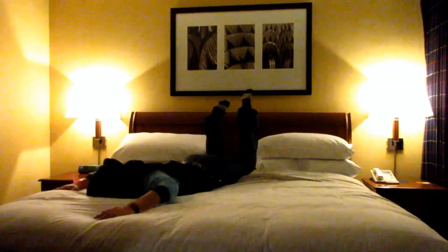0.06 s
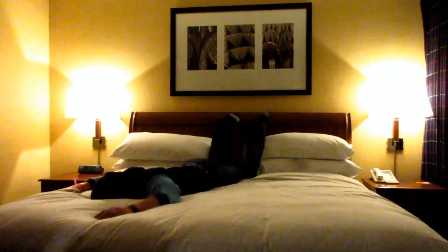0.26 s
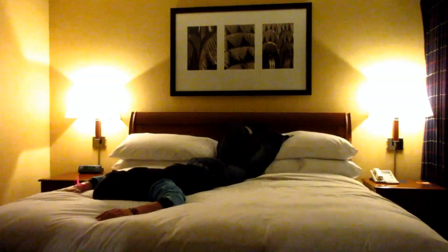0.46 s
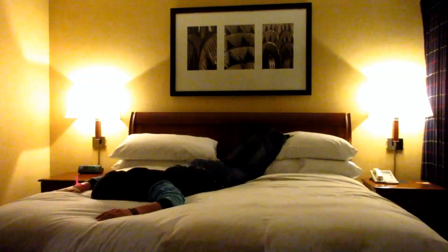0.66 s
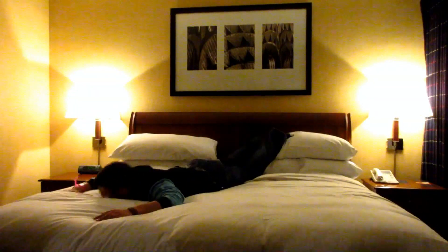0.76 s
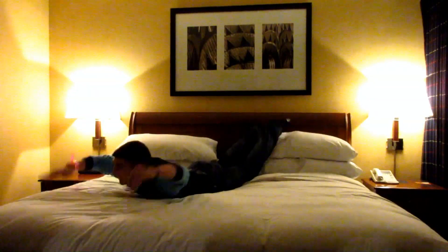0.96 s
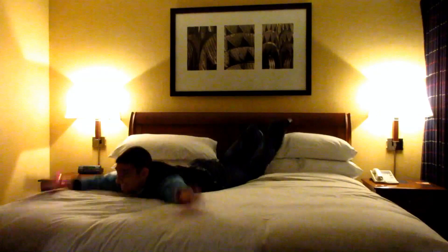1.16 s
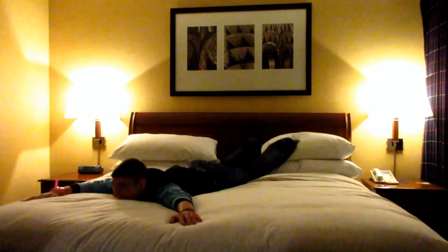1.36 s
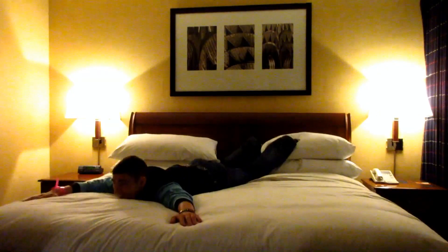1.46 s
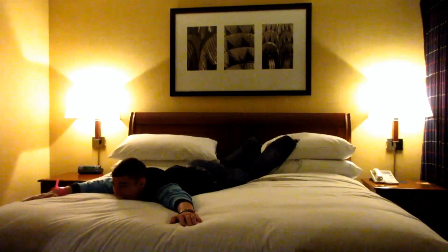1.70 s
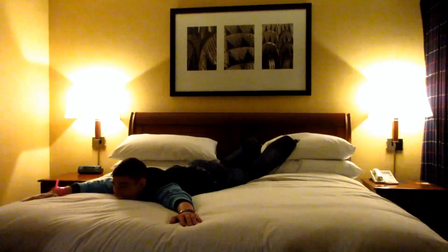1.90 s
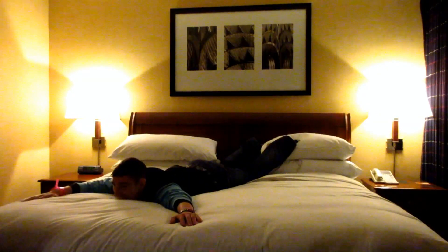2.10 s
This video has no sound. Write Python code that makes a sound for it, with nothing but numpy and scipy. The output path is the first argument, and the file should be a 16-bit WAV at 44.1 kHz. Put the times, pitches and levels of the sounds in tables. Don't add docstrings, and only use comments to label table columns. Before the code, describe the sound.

A body flops onto a mattress with a low thump, then a knock on the wooden headboard

```python
import sys
import numpy as np
from scipy import signal
from scipy.fft import rfft, irfft
from scipy.io import wavfile

SR = 44100
rng = np.random.default_rng(int(sys.argv[2]) if len(sys.argv) > 2 else 0)


def transcribe(u):
    v = np.clip(np.atleast_2d(u).T, -1, 1)
    q = np.round(v * 32767).astype(np.int16)
    wavfile.write(sys.argv[1], SR, q)


def elevation(decibels):
    levels = np.asarray(decibels, float)
    return 10 ** (levels / 20)


N = 94374


def rms_one(x):
    return x / np.sqrt(np.mean(x ** 2) + 1e-20)


def high_pass(x, hz):
    return signal.sosfilt(signal.butter(2, hz, "high", fs=SR, output="sos"), x)


def coloured(x, points):
    hz, db = np.transpose(points)
    f = np.maximum(np.fft.rfftfreq(N, 1 / SR), 1)
    low_edge = np.minimum(f / hz[0], 1) ** 2
    gain = elevation(np.interp(np.log(f), np.log(hz), db))
    return rms_one(irfft(rfft(x) * low_edge * gain, N))


def drift(rate_hz):
    r = np.exp(-2 * np.pi * rate_hz / SR)
    wander = signal.lfilter([1], [1, -2 * r, r * r], rng.standard_normal(N + SR))
    return rms_one(wander[SR:])


def resonate(x, hz, width_hz):
    r = np.exp(-np.pi * width_hz / SR)
    return rms_one(signal.lfilter([1, 0, -1], [1, -2 * r * np.cos(2 * np.pi * hz / SR), r * r], x))


def ring(force, modes, damping):
    out = 0
    for hz, db, t60 in modes:
        r = elevation(-60 / (t60 * damping * SR))
        w = 2 * np.pi * hz / SR
        mode = signal.lfilter([0, np.sin(w)], [1, -2 * r * np.cos(w), r * r], force + 1e-18)
        out = out + elevation(db) * mode
    return out


def burst(s, rise_s, t60):
    t = np.arange(N) / SR - s
    swell = np.clip(1 + t / rise_s, 0, 1) ** 2
    return np.where(t < 0, swell, elevation(-60 * np.maximum(t, 0) / t60))


def contact(s, width_s):
    u = np.maximum(np.arange(N) / SR - s + width_s / 2, 0) / (width_s / 2)
    return u * np.exp(1 - u)


def grains(spread_db):
    return rng.standard_normal(N) * elevation(spread_db * np.minimum(rng.exponential(1, N), 5))


# time in seconds, air push in dB, slap in dB, contact time in seconds.
LANDINGS = [
    (.001, -16.5, -36, 0.0026),
    (.0430, -1, -20, 0.00075),
    (0.0491, -9.5, -29, 0.0014),
    (0.0558, -9, -35, 0.0014),
    (0.0629, -10, -35, 0.0014),
    (0.067, -11.5, -39, 0.0012),
    (.160, -10, -37, 0.0019),
    (0.1657, -8, -33.5, 0.0017),
    (0.178, -16, -31, 0.0012),
    (.189, -19, -39, 0.002),
]
# frequency in Hz, level in dB, t60 in seconds.
MATTRESS_MODES = [(156.3, -24, 0.033), (186, -20.5, 0.09), (248, -19.5, 0.093), (296, -22, 0.13),
                  (407, -20.5, 0.12), (517, -39, 0.07), (637, -23.5, 0.15), (750, -17, 0.15),
                  (950, -30, .06), (1160, -32, .05)]
# frequency in Hz, level in dB per Hz.
SLAP_COLOUR = [(410, -18), (700, -0.5), (1500, -5), (2400, -7), (3430, -18), (6110, -19), (15000, -39)]


def thumps():
    lead_s, slap_t60_s = 0.012, 0.03
    crack_db, sharp_s = 9.5, 0.00069
    push, force, slap = 0, 0, 0
    for s, push_db, slap_db, width_s in LANDINGS:
        pulse = elevation(push_db) * contact(s, width_s)
        push = push + pulse
        force = force + pulse / (width_s * SR)
        crack = elevation(crack_db) * (sharp_s / width_s) ** 2 * burst(s, width_s, 6 * width_s)
        slap = slap + elevation(slap_db) * (burst(s, lead_s, slap_t60_s) + crack)
    body = high_pass(push + ring(force, MATTRESS_MODES, 0.82), 100)
    return body + slap * coloured(grains(2.3), SLAP_COLOUR)


# time in seconds, level in dB, contact time in seconds.
BOARD_HITS = [
    (1.4973, -25, 0.0004),
    (1.5012, -15.5, 0.00036),
    (1.504, -16.5, 0.0004),
    (1.5065, -13.5, 0.00043),
    (1.5098, -28, 0.00023),
    (1.5117, -3.5, 0.00033),
    (1.5126, -13, 0.00019),
    (1.5174, -12.5, 0.0002),
    (1.524, -14, 0.00015),
]
# frequency in Hz, level in dB, t60 in seconds.
BOARD_MODES = [(221, -16.5, 0.096), (330, -9, 0.082), (700, -14, 0.12), (736, -8.5, 0.2), (800, -12, 0.15),
               (895, -7, 0.11), (970, 10, 0.014), (1079, -11.5, 0.13), (1270, -16, 0.11), (1387, -30, 0.12),
               (1770, -29, .08), (2150, -19, 0.084), (2580, -11.5, .07), (3070, -13, 0.084)]
# frequency in Hz, level in dB per Hz.
SCUFF_COLOUR = [(180, -33), (300, 7), (562, -23), (731, 1.5), (1810, -7), (7370, -27.5), (15500, -50)]


def knock():
    board_db, damping, crack_db = -8, 0.62, -2.5
    force, crack = 0, 0
    for s, db, width_s in BOARD_HITS:
        force = force + elevation(db) * contact(s, width_s) / (width_s * SR)
        crack = crack + elevation(db + crack_db) * burst(s + 0.0012, 0.0011, 0.0086)
    wood = -elevation(board_db) * ring(force, BOARD_MODES, damping)
    scuff = elevation(-22) * burst(1.513, rise_s=0.033, t60=0.21)
    noise = coloured(grains(4.0), SCUFF_COLOUR)
    return wood + crack * high_pass(noise, 1360) + scuff * noise


# time in seconds, level in dB, crispness of the cloth in dB.
DRAG_PATH = [(0, -41, -2.5), (.03, -50, -1), (.09, -41.5, -3.5), (.17, -36.5, -9), (.24, -42, -2),
             (.3, -46.5, -4), (.37, -49.5, 0.5), (0.528, -51, 0.5), (.59, -46, -3), (.7, -49, -4),
             (.91, -56, 2), (1.2, -46.5, -1), (1.3, -51, 1.5), (1.48, -51, -0.5), (1.62, -50, -1.5),
             (1.74, -61, 0), (1.8, -71, -5), (2.14, -62, 5)]
# frequency in Hz, level in dB per Hz.
CLOTH_COLOUR = [(150, -45), (250, 2.5), (318, -12.5), (474, -11), (603, -5.5), (742, -9.5), (4470, -25),
                (15500, -41)]


def bedding():
    cloth_db, patchy_db, grain_db, crisp_hz = 7, 1, 2.5, 6000
    s, drag_db, crisp_db = np.transpose(DRAG_PATH)
    t = np.arange(N) / SR
    level_db = np.interp(t, s, drag_db) + cloth_db + patchy_db * drift(11.5)
    rub = coloured(grains(grain_db), CLOTH_COLOUR)
    dull = signal.sosfiltfilt(signal.butter(4, crisp_hz, fs=SR, output="sos"), rub)
    crisp = elevation(np.interp(t, s, crisp_db)) * (rub - dull)
    return elevation(level_db) * (dull + crisp)


# time in seconds, level in dB, centre in Hz, width in Hz,
# t60 in seconds.
SNAPS = [(.264, -37.5, 2310, 1940, 0.17), (0.273, -50, 6900, 3970, .08), (0.294, -42.5, 3900, 2500, 0.04),
         (.308, -40.5, 3400, 2470, 0.1), (0.577, -32, 1890, 1500, 0.011), (.59, -43, 840, 120, 0.38),
         (.585, -45.5, 2500, 2500, 0.071), (.814, -62, 3000, 3000, .03), (1.376, -50, 10900, 6000, 0.027),
         (1.387, -60, 11500, 5000, .04), (1.626, -38, 2150, 700, 0.06), (1.628, -47, 3870, 2980, 0.18),
         (1.784, -45.5, 1860, 1470, 0.13), (1.783, -57.5, 8500, 4000, 0.089), (1.956, -43, 800, 587, 0.02),
         (2.021, -58, 3000, 2000, 0.11)]


def ticks():
    noise, out = grains(3.1), 0
    for s, db, hz, width_hz, t60 in SNAPS:
        colour = resonate(resonate(noise, hz, width_hz), hz, width_hz)
        out = out + elevation(db) * burst(s, 0.12 * t60, t60) * colour
    return out


# start in seconds, length in seconds, pitch in Hz, level in dB.
SQUEAK_LIST = [
    (.452, .085, 12800, -66),
    (1.095, .02, 12800, -68),
    (1.372, .025, 12900, -64),
]


def squeaks():
    noise, t, out = grains(3.1), np.arange(N) / SR, 0
    for s, length_s, hz, db in SQUEAK_LIST:
        fade = np.clip(np.minimum(t - s, s + length_s - t) / 0.0085, 0, 1)
        out = out + elevation(db) * fade * resonate(resonate(noise, hz, 71), hz, 80)
    return out


# frequency in Hz, level in dB per Hz.
AIR_COLOUR = [(28, -3.5), (55, -3.5), (118, -15), (200, -12.5), (480, -15.5), (2200, -42), (7500, -53),
              (15500, -64)]
# frequency in Hz, width in Hz, level in dB.
DUCT_MODES = [(47, 28.5, -43), (154.4, 22.4, -36.5), (154.1, 6.4, -42), (267, 18, -44.5), (355.3, 35, -48),
              (448.7, 35, -46.5), (1616, 180, -56)]


def ventilation():
    out = elevation(-32.5) * coloured(rng.standard_normal(N), AIR_COLOUR)
    for hz, width_hz, db in DUCT_MODES:
        hum = resonate(rng.standard_normal(N), hz, width_hz)
        out = out + elevation(db) * resonate(hum, hz, 2 * width_hz)
    return out


# frequency in Hz, t60 in seconds.
ROOM_DECAY = [(100, 0.19), (500, 0.31), (2000, 0.19), (6000, 0.18), (14000, 0.13)]


def room(x):
    gap_s = 0.0062
    t, answer = np.arange(SR // 2) / SR, 0
    hz, t60 = np.transpose(ROOM_DECAY)
    for low in 60 * 2 ** np.arange(8):
        band = signal.butter(2, [low, 2 * low], "band", fs=SR, output="sos")
        decay_s = np.interp(np.log(low * 2 ** .5), np.log(hz), t60)
        answer = answer + signal.sosfilt(band, rng.standard_normal(len(t))) * elevation(-60 * t / decay_s)
    answer = answer * np.clip(t / gap_s - 1, 0, 1)
    return signal.fftconvolve(x, answer / np.sqrt(np.sum(answer ** 2)))[:N]


def scene():
    blows = thumps() + knock() + ticks() + squeaks()
    steady = bedding() + ventilation()
    return (steady + blows + elevation(-10.5) * room(blows))[None]


def band_limit(x):
    return signal.sosfilt(signal.butter(12, 15700, fs=SR, output="sos"), x)


def record(dry):
    x = high_pass(dry, 40)
    x = signal.sosfilt(signal.cheby2(10, 24, 15250, fs=SR, output="sos"), x)
    return band_limit(x)


dry = scene()
out = record(dry)
transcribe(out)
```